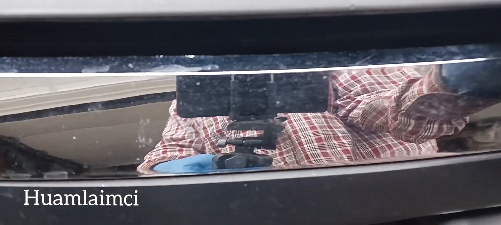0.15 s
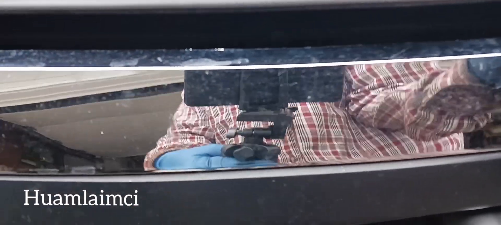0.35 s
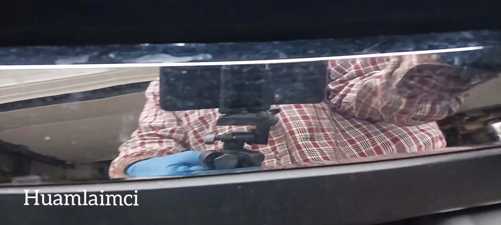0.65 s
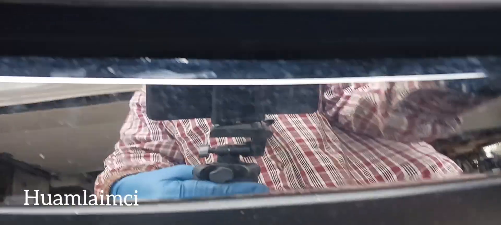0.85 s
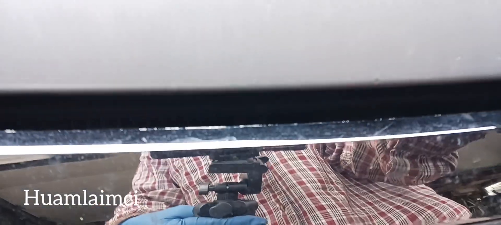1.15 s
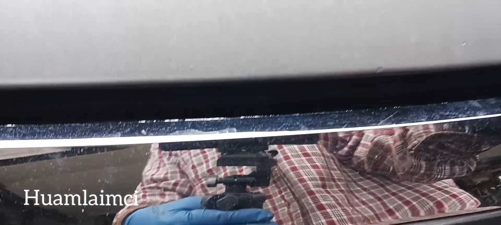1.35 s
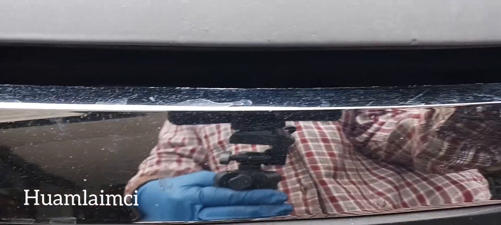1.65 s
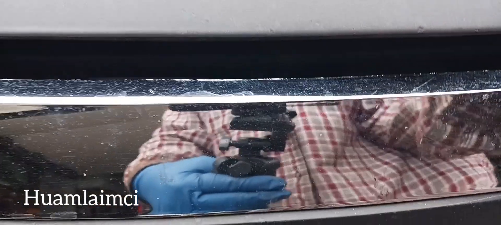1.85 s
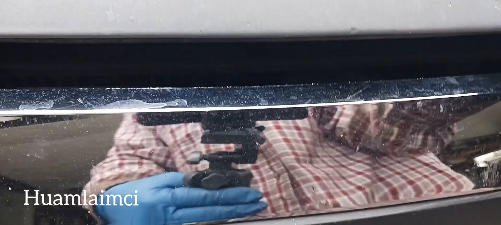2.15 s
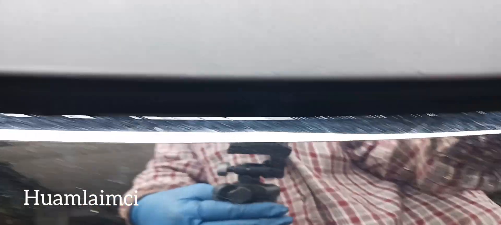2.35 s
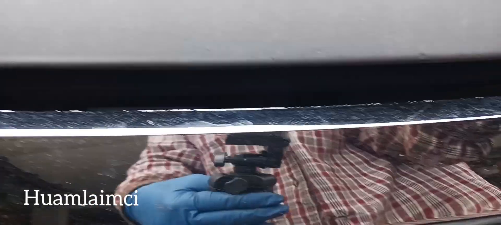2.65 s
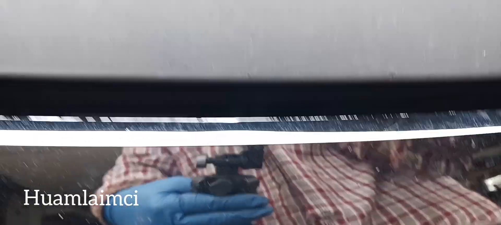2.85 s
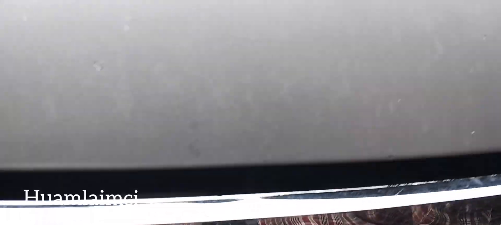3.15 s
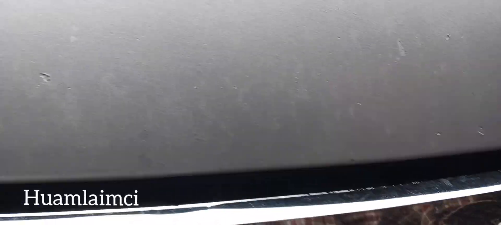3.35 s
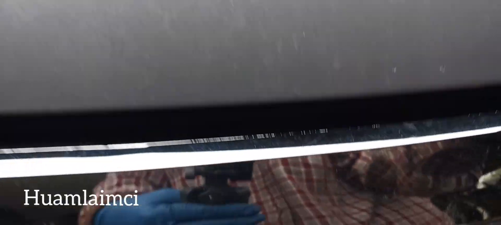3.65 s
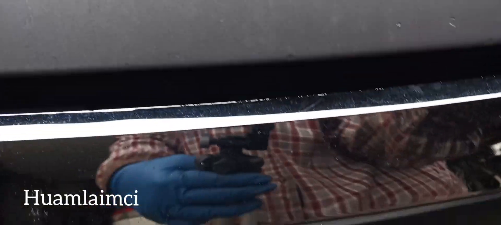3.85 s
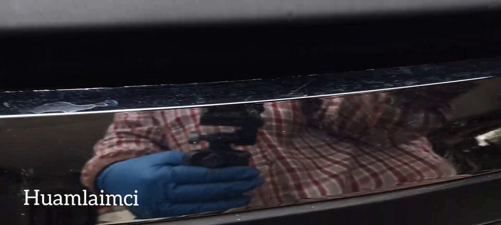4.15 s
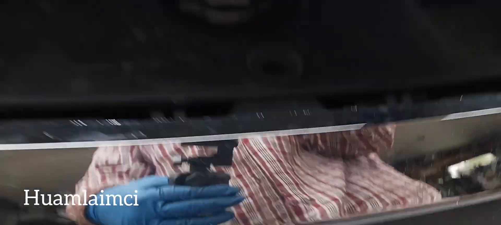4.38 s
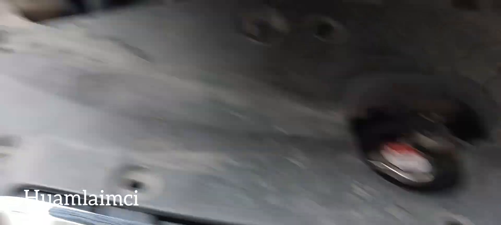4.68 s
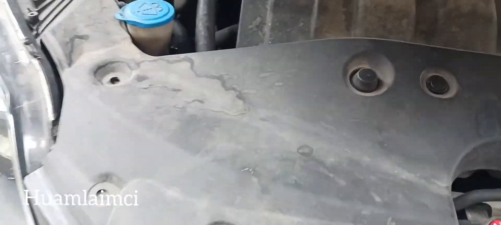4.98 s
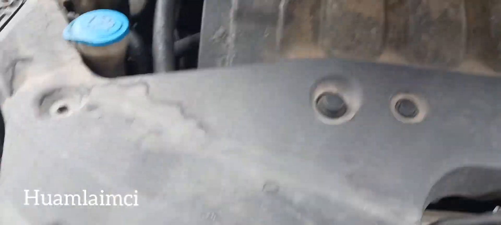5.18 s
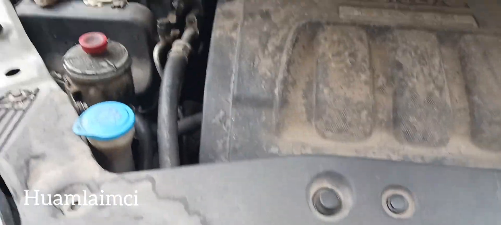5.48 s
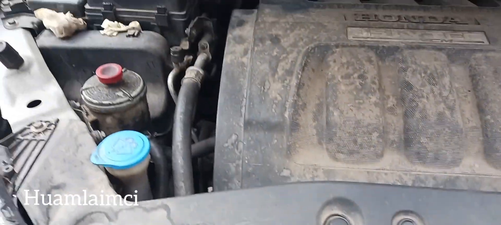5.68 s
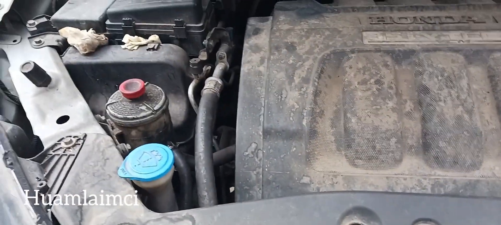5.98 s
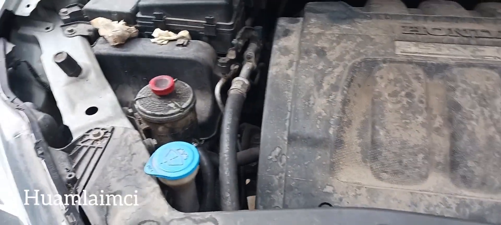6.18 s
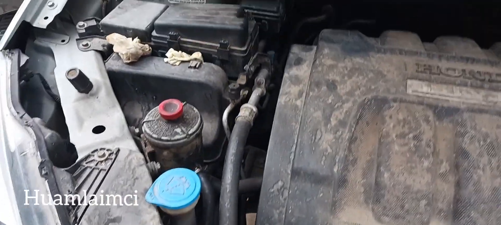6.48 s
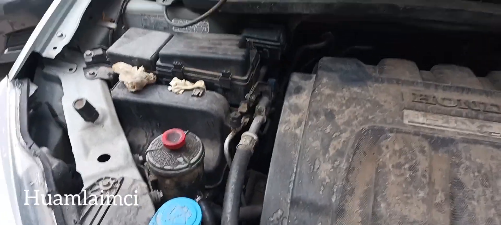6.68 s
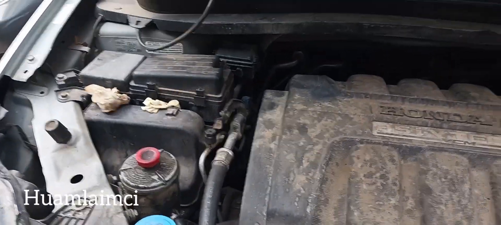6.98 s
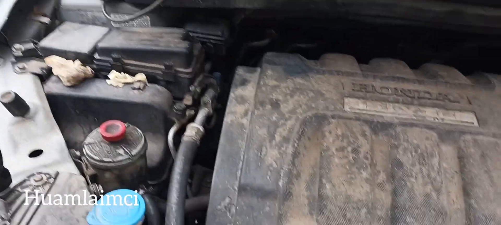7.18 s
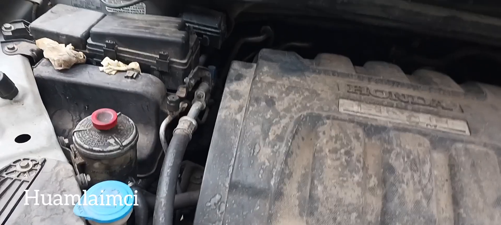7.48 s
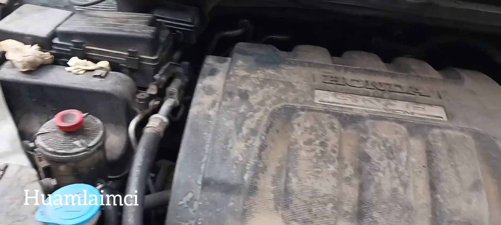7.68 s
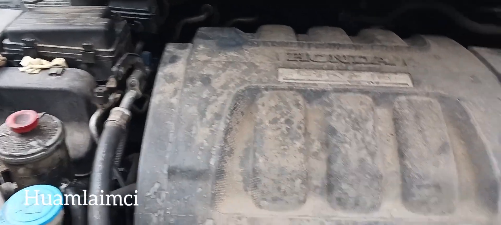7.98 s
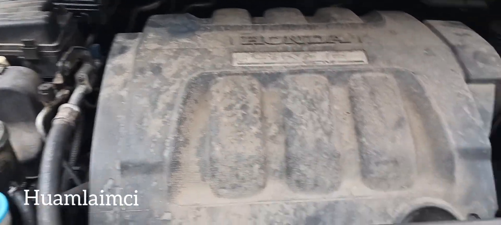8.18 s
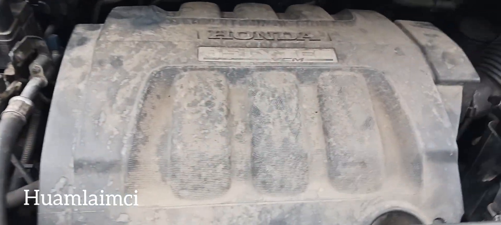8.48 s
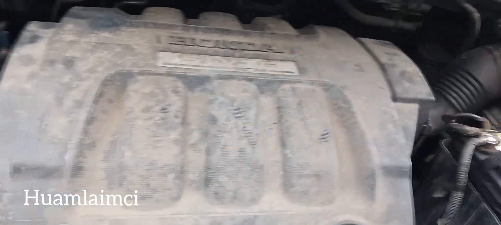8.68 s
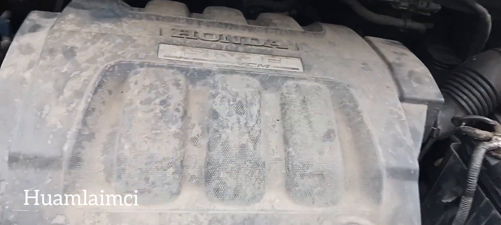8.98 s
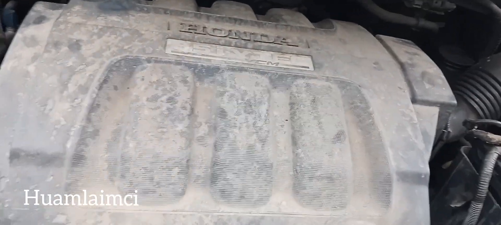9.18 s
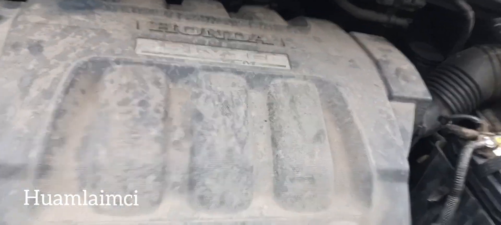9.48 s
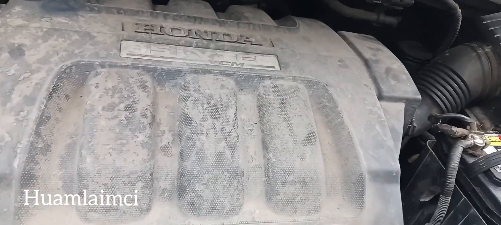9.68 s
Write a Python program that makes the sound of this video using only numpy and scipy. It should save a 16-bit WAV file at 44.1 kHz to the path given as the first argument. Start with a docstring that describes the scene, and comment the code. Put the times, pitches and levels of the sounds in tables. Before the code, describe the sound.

Close outdoors, a car hood thumps on its catch, the steel latch snaps and rings, then the panel springs up with clatter and small ticks.

```python
"""A car hood, close by outdoors, bumps on its catch, is unlatched and lifted: struck panel and latch modes.
The steel latch cracks as shaped noise and its springs ring as long modes; ticks, slips and sleeve rub follow.
A bird chips farther off in raspy swept tones; wavering sines make faint far bird notes and one thin ring,
probably of the catch spring. Shaped noise makes wind on the two camera microphones and far traffic; two low
tones are distant engines, a thin insect hiss comes and goes, and the camera mount whines now and then."""
import sys
import numpy as np
from scipy import signal
from scipy.fft import rfft, irfft, next_fast_len
from scipy.io import wavfile
from scipy.ndimage import uniform_filter1d

SR = 44100
rng = np.random.default_rng(int(sys.argv[2]) if len(sys.argv) > 2 else 0)


def digitize_waveform(pressure):
    """Quantize a signal to 16-bit integers and store it at the path in sys.argv[1].

    Rows of a 2-D input are taken as channels; values are limited to [-1, 1].
    """
    field = np.atleast_2d(pressure).T
    bounded = np.clip(field, -1, 1)
    quanta = np.round(bounded * 32767).astype(np.int16)
    wavfile.write(sys.argv[1], SR, quanta)


N = 433503
TIME = np.arange(N) / SR  # seconds into the scene
AGE = np.arange(32768) / SR  # seconds since a sound began


def amp(db):
    """Decibels to gain."""
    return 10 ** (np.asarray(db) / 20)


def unit(x):
    """Scales to rms 1."""
    return x / np.sqrt(np.mean(x ** 2) + 1e-20)


def fall(t60):
    """Gain of free decay: 60 dB lost in t60 seconds."""
    return np.exp(-np.log(1000) * AGE / t60)


def read(points, hz):
    """Reads a table on a log-frequency axis."""
    f, value = np.transpose(points)
    return np.interp(np.log(hz + 1), np.log(f + 1), value)


def swell(s, db):
    """Gain that follows a level curve and fades to silence outside it."""
    inside = 1. * ((TIME >= s[0]) & (TIME <= s[-1]))
    return amp(np.interp(TIME, s, db)) * uniform_filter1d(inside, size=900)


def wander(per_s):
    """Slow random drift about zero, with a new turn per_s times a second."""
    return np.interp(TIME * per_s, np.arange(512), rng.standard_normal(512))


def jitter(size, smooth):
    """Random unsteadiness of rms 1, averaged over `smooth` samples."""
    return unit(uniform_filter1d(rng.standard_normal(size), size=smooth))


def add(mix, s, sound, pan_db=0):
    """Mixes a sound in at time s, leaning left by pan_db."""
    sound = sound * amp([[pan_db / 2], [-pan_db / 2]])
    sound = sound[:, max(-round(s * SR), 0):]  # a negative time cuts off the start
    part = mix[:, max(round(s * SR), 0):][:, :sound.shape[1]]
    part += sound[:, :part.shape[1]]


# likeness of the two microphones: f/Hz, likeness/0-1
MIC_LIKENESS = [(30, 0.4), (100, 0.78), (250, 0.9), (500, 0.5), (1000, 0), (4000, 0.03), (14000, 0)]


def noise(spectrum, size):
    """Coloured noise at two microphones, alike in the bass and nearly unrelated in the treble."""
    full = next_fast_len(size)
    hz = np.fft.rfftfreq(full, 1 / SR)
    left, other = np.exp(2j * np.pi * rng.random((2, len(hz))))
    alike = np.clip(read(MIC_LIKENESS, hz), -1, 1)
    right = alike * left + np.sqrt(1 - alike ** 2) * other
    shaped = np.array([left, right]) * amp(read(spectrum, hz)) * (hz > 0)
    return unit(irfft(shaped, full)[:, :size])


def wash(spectrum, decay, tilt_db=0, count=9):
    """Noise standing for countless crowded modes struck at once: each band dies at its own speed."""
    hz = np.fft.rfftfreq(len(AGE), 1 / SR)
    tilted = [(f, db + tilt_db * np.log2(f)) for f, db in spectrum]
    z = rfft(noise(tilted, len(AGE)))
    centres = np.geomspace(60, 15000, count)
    out = 0
    for f, band in zip(centres, np.eye(count)):
        share = read(np.c_[centres, band], hz)  # overlapping triangular bands
        out = out + irfft(z * share) * fall(read(decay, f))
    return out


def onset(rise):
    """Vibration takes a moment to spread through the metal."""
    return 1 - np.exp(-AGE / rise)


def ring(modes, detune=.006, apart=1):
    """Clear decaying modes; higher ones reach the two microphones out of step."""
    out = np.zeros((2, len(AGE)))
    for hz, db, t60 in modes:
        drift, skew, start = rng.standard_normal(3)
        phase = start + np.array([[1], [-1]]) * apart * skew * (1 - read(MIC_LIKENESS, hz))
        tone = np.sin(2 * np.pi * hz * (1 + detune * drift) * AGE + phase)
        out += amp(db) * fall(t60) * tone
    return out * onset(0.00082)


def jangle(low_hz, high_hz, t60, count=64):
    """Brackets and sheet metal ring with scattered modes; the higher ones tend to die sooner."""
    place, size, life = rng.random((3, count))
    hz = low_hz * (high_hz / low_hz) ** place
    lives = t60 * (.5 + life) * np.sqrt(low_hz / hz)
    return ring(np.c_[hz, -12 * size, lives]) / np.sqrt(count / 6)


def push(width):
    """One swing of air, down and up, from a panel shoved once."""
    u = AGE / width - 3
    return u * np.exp((1 - u ** 2) / 2)


# wind rumble on the microphones: f/Hz, relative level/dB per Hz
WIND_SPECTRUM = [(10, -56), (22, -25), (32, -17.5), (45, 3), (70, 1.5), (90, -4), (110, -6), (230, -22.5),
                 (280, -19), (450, -37), (800, -74)]
# far traffic across the yard: f/Hz, relative level/dB per Hz
TRAFFIC_SPECTRUM = [(150, -1), (350, 2), (550, -7), (900, 1.5), (1400, -2.5), (2000, -9), (2800, -20.5),
                    (4200, -20.5), (6000, -24.5), (9000, -24.5), (13000, -22.5), (16000, -27.5)]
# wind rumble over time: t/s, level/dB
WIND_COURSE = [(0, -44.5), (0.9, -44.5), (1.6, -45.5), (2.7, -45), (3.8, -51), (6.5, -48.5), (7.5, -49.5),
               (8.7, -45), (9.83, -49)]
# distant engine easing off and pulling again: t/s, f/Hz, level/dB before drone_db
ENGINE_COURSE = [(0.15, 85.2, -68), (0.35, 84.8, -42.5), (0.8, 83, -44), (1.499, 81.3, -40.5),
                 (1.85, 72.9, -50.5), (2.02, 70.7, -34.5), (2.45, 72.4, -38), (2.95, 75.7, -53)]


def outdoors(gust_db=3, gusts_per_s=14, traffic_db=-63.0, swell_db=-0.46,
             drone_db=-1.5, idle_db=-56, idle_hz=81):
    """Lumpy wind on the microphones, a wash of far traffic, one droning engine and a fainter one idling."""
    out = np.zeros((2, N))
    wind = unit(noise(WIND_SPECTRUM, N) * amp(gust_db * wander(gusts_per_s)))
    add(out, 0, amp(np.interp(TIME, *np.transpose(WIND_COURSE))) * wind, -3.5)
    add(out, 0, amp(traffic_db + swell_db * wander(2.8)) * noise(TRAFFIC_SPECTRUM, N), 1.5)
    s, hz, db = np.transpose(ENGINE_COURSE)
    engine = np.sqrt(2) * np.sin(2 * np.pi * np.cumsum(np.interp(TIME, s, hz)) / SR)
    add(out, 0, amp(drone_db) * swell(s, db) * engine, -1)
    idle_level = amp(idle_db + 3 * wander(3))
    idle = np.sin(2 * np.pi * np.cumsum(idle_hz + 1.5 * wander(1.3)) / SR)
    add(out, 0, idle_level * idle, -3)
    return out


# bird chips: t/s, level/dB, starting f/Hz, level/dB of the hollow note under it
BIRD_CHIPS = [(-0.022, -33.5, 4400, -31.5), (1.329, -36.5, 5050, -42), (3.587, -35, 4520, -32)]
# hollow note under a chip: f/Hz, relative level/dB per Hz
HOLLOW_SPECTRUM = [(250, -33), (440, -13), (520, -7.5), (560, -9.5), (640, -22.5), (1000, -26), (3000, -67)]
# echo of a chip: f/Hz, relative level/dB per Hz
CHIP_ECHO_SPECTRUM = [(2000, -64), (3100, -17), (3500, -7), (3720, 2), (3920, -5.5), (4150, -15),
                      (4380, -9.5), (4650, -26), (5000, -34.5), (8000, -68)]


def birds(end_hz=3640, length=0.025, echo_db=-16, echo_t60=0.68,
          linger_db=-13, linger_hz=3820, linger_t60=.8, sag_hz_per_s=650,
          second_voice=.86, second_db=-12, wall_db=-7, wall_t60=0.23):
    """Quick, raspy downward sweeps in two voices; near walls smear them and a sagging tone lingers in trees."""
    out = np.zeros((2, N))
    t = AGE[AGE < length]
    rasp = .08  # rms pitch shake, as a share of the pitch
    for s, db, start_hz, hollow in BIRD_CHIPS:
        hz = end_hz + (start_hz - end_hz) * np.exp(-t / 0.01)
        shaken_hz = hz * (1 + rasp * jitter(len(t), 12))
        phase = 2 * np.pi * np.cumsum(shaken_hz) / SR + rng.uniform(-1, 1, (2, 1))
        voice = sum(amp(level) * np.sin((k + 1) * phase) for k, level in enumerate([-1.5, -9, -14, -18]))
        voice = voice + amp(second_db) * np.sin(second_voice * phase)
        chip = amp(db) * unit(voice * signal.windows.tukey(len(t), .7))
        add(out, s, chip, 2)

        walls = wash([(2000, 0), (16000, 0)], [(3000, wall_t60), (5000, wall_t60)]) * onset(.002)
        smear = signal.fftconvolve(chip, walls / np.linalg.norm(walls[0]), axes=1)
        add(out, s, amp(wall_db) * smear, 1)
        echo = wash(CHIP_ECHO_SPECTRUM, [(3000, echo_t60), (5000, echo_t60)])
        add(out, s, amp(db + echo_db) * echo * onset(0.0045))

        sagging = np.sin(2 * np.pi * (linger_hz - sag_hz_per_s * AGE / 2) * AGE)
        linger = sagging * noise([(10, 1.5), (55, -7), (260, -33.5), (2000, -90.5)], len(AGE))
        add(out, s, amp(db + linger_db) * linger * fall(linger_t60) * onset(.01))
        add(out, s, amp(hollow) * wash(HOLLOW_SPECTRUM, [(100, 0.32), (1000, 0.17)]) * onset(.006))
    return out


STROKE_FADE_DB = -26  # lost over the fade time


def stroke(s, rise, fade):
    """Gain of one rub: a smooth swell, then a steady fall in decibels."""
    age = TIME - s
    rising = np.sin(np.pi / 2 * np.clip(age / rise, 0, 1)) ** 2
    return rising * amp(STROKE_FADE_DB * np.maximum(age - rise, 0) / fade)


# sleeve rubs: t/s, swell time/s, fade time/s, level/dB before cloth_db
SLEEVE_RUBS = [(0.0, .01, 1, -60.5), (0.95, 0.49, 0.27, -60), (2.95, 0.12, 0.34, -54.5),
               (4.6, 0.066, 0.29, -53.5), (5.06, 0.064, 0.14, -63.5), (6.75, 0.034, 0.14, -49),
               (8.549, 0.037, 0.39, -50), (8.99, 0.045, 0.48, -67.5), (9.135, 0.029, 0.15, -48)]
# rubbed cloth: f/Hz, relative level/dB per Hz
CLOTH_SPECTRUM = [(300, 0), (1500, 1), (3800, -0.5), (7000, -6), (13000, -7.5), (16000, -12.5)]
# soft low bumps of hood and hand: t/s, peak level/dB before panning, f/Hz, swell time/s
SOFT_BUMPS = [(0.992, -29, 118, 0.0088), (4.093, -25.5, 68.3, 0.022), (4.282, -28.5, 62.8, 0.015),
              (5.008, -36.5, 126, 0.0025), (5.134, -32.5, 72, 0.0066), (6.453, -29, 72.8, 0.0061),
              (7.019, -35, 68.5, 0.011), (8.48, -27, 145, 0.0027), (8.811, -41, 49, 0.019),
              (8.907, -31, 70.6, 0.0083)]


def handling(cloth_db=-1, grain_db=1.5):
    """A sleeve rubs in tiny catches; hood and hand give soft low bumps."""
    out = np.zeros((2, N))
    grain = amp(grain_db * jitter(N, 90))
    rubbing = sum(amp(db) * stroke(s, rise, fade) for s, rise, fade, db in SLEEVE_RUBS)
    add(out, 0, amp(cloth_db) * unit(noise(CLOTH_SPECTRUM, N) * grain) * rubbing, 2)
    for s, peak, hz, rise in SOFT_BUMPS:
        envelope = AGE / rise * np.exp(1 - AGE / rise)  # reaches 1 at the swell time
        add(out, s, amp(peak) * np.sin(2 * np.pi * hz * AGE) * envelope, -4)
    return out


# ticks of hinge, prop and fingers: t/s, knock level/dB and click level/dB before trims, left-right/dB
SMALL_TICKS = [(0.257, -71, -62.5, 15), (1.131, -57, -59, 3), (4.053, -55.5, -52.5, 5.5),
               (4.459, -60.5, -52, 2), (4.482, -44.5, -43.5, 3), (4.496, -43, -44, -2),
               (4.555, -41, -47.5, -5), (4.606, -42.5, -61, -4), (4.818, -35.5, -46.5, -7),
               (5.055, -58, -74, -1.5), (5.37, -79.5, -57.5, 5), (7.508, -46.5, -75, -1.5),
               (7.537, -44.5, -44.5, -1), (8.649, -39.5, -70, 2.5), (8.678, -48, -58, -9),
               (8.788, -58, -45, -1), (9.274, -51.5, -78, 1), (9.458, -50.5, -64.5, -0.5)]
# hollow knock: f/Hz, relative level/dB per Hz
KNOCK_SPECTRUM = [(100, 6.5), (400, -5), (800, -5.5), (1400, -4.5), (2000, -10), (3000, -11.5), (6000, -26)]
# hard bright crack of steel, also the click of a tick: f/Hz, relative level/dB per Hz
CRACK_SPECTRUM = [(500, -17), (1500, -5.5), (3200, -3.5), (5000, 3), (6200, -3.5), (7500, -1.5), (9000, -1),
                  (13500, -3.5), (16000, -13)]
# decay of small parts: f/Hz, t60/s
SMALL_PART_DECAY = [(200, 0.088), (1300, 0.2), (4000, 0.088), (14000, .04)]


def ticks(knock_db=2, click_db=0, contact_db=7, contact_s=.003):
    """Small hard parts touch: a bright click over a short, hollow knock."""
    out = np.zeros((2, N))
    contact = (1 + amp(contact_db) * np.exp(-AGE / contact_s)) * onset(0.0017)
    for s, knock, click, pan in SMALL_TICKS:
        hollow = amp(knock + knock_db) * wash(KNOCK_SPECTRUM, SMALL_PART_DECAY)
        bright = amp(click + click_db) * wash(CRACK_SPECTRUM, SMALL_PART_DECAY)
        add(out, s, (hollow + bright) * contact, pan)
    return out


# hood bumps on the catch: t/s, body level/dB and edge level/dB before trims,
# left-right/dB of the body before trim
HOOD_THUDS = [(0.54, -19.5, -27, -3), (0.777, -29.5, -45.5, -3.5), (0.943, -21.5, -27, -2),
              (1.926, -20.5, -35, -3), (2.248, -33, -62, -2.5), (2.554, -18.5, -31, -2),
              (2.834, -30.5, -57, -2), (2.862, -30, -46.5, -3), (4.091, -22.5, -35, -3.5),
              (4.28, -22.5, -25.5, -5.5)]
# body of the panel: f/Hz, relative level/dB per Hz
PANEL_BODY_SPECTRUM = [(10, -55.5), (25, -21), (50, -5), (130, -10.5), (240, -1), (360, -0.5), (520, -4.5),
                       (750, -9.5), (1200, -16.5), (2000, -45), (5000, -78.5)]
# harder edge of the thud: f/Hz, relative level/dB per Hz
PANEL_EDGE_SPECTRUM = [(300, -21.5), (700, -2.5), (1150, 5.5), (1800, -10), (2700, -11), (4000, -22.5),
                       (7000, -29), (15000, -39.5)]
# clear panel modes before detuning: f/Hz, relative level/dB, t60/s
PANEL_MODES = [(66.6, -15.5, 0.22), (133, -6, 0.47), (185.4, -4.5, 0.39), (225.1, -4.5, 0.6),
               (278, -1, 0.15), (337, -1, 0.24), (369.4, -6, 0.53), (447, -10, .35), (523, -12.5, .25),
               (633, -12, 0.057), (890, -22.5, 0.14), (1106, -12, 0.29), (1350, -27.5, 0.31)]
# decay of the sheet metal: f/Hz, t60/s
SHEET_DECAY = [(60, 0.13), (250, 0.38), (600, 0.21), (1500, 0.23), (4000, 0.24), (14000, 0.22)]


def hood(body_db=-3, edge_db=0, modes_db=-5, jangle_db=-6, push_db=8,
         rebound_s=.0195, rebound_db=-2, firm_db=-23, dulling=0.23):
    """The panel hits the catch, rings, and rebounds once on its rubber stops; soft bumps are duller."""
    out = np.zeros((2, N))
    brackets = jangle(900, 3600, 0.15)
    shove = amp(push_db) * push(.0008)
    for s, level, edge, pan in HOOD_THUDS:
        tilt = dulling * min(level - firm_db, 0)  # dB an octave
        body = amp(body_db) * wash(PANEL_BODY_SPECTRUM, SHEET_DECAY, tilt) * onset(0.0043)
        body = body + amp(modes_db) * ring(PANEL_MODES)
        add(out, s, amp(level) * (body + shove), pan - 1)
        add(out, s + rebound_s, -amp(level + rebound_db) * shove, pan - 2)
        rim = amp(edge_db) * wash(PANEL_EDGE_SPECTRUM, SHEET_DECAY) + amp(jangle_db) * brackets
        add(out, s, amp(edge) * rim * onset(0.0026), 1)
    return out


def shudder(rumble_db=-21, rumble_t60=0.64, rattle_db=-33, rattle_t60=1.0):
    """Every blow shakes the car body: a low rumble and a faint rattle die away after it."""
    out = np.zeros((2, N))
    blows = [(s, body) for s, body, _, _ in HOOD_THUDS]
    blows += [(s, clang) for s, _, _, _, clang, _, _ in LATCH_SNAPS]
    for s, db in blows:
        rumble = amp(rumble_db - 60 * AGE / rumble_t60) * noise(WIND_SPECTRUM, len(AGE))
        rattle = amp(rattle_db - 60 * AGE / rattle_t60) * noise(TRAFFIC_SPECTRUM, len(AGE))
        add(out, s, amp(db) * (rumble + rattle) * onset(.01), -2)
    return out


# latch snaps and rattles, levels before trims: t/s, crack level/dB, first-contact spike/dB,
# brightness/dB an octave, clang level/dB, hood weight in the clang/dB, left-right/dB of the crack
LATCH_SNAPS = [(0.797, -32, 14, -4, -15.5, -11.5, 2.5), (0.808, -33, 21.5, -11, -13.5, -2, 4.5),
               (0.946, -62, 7, 5, -45, 8, -4.5), (0.999, -52, 9, -22, -31.5, 0.5, 3),
               (3.176, -27.5, 6, -4, -12.5, -2, -0.5), (4.267, -40, 9, 1, -45.5, -5, 1.5),
               (4.277, -41.5, 6.5, -2.5, -38, -8.5, -0.5), (4.304, -23.5, 15.5, 3.5, -18.5, -28, -3),
               (4.311, -29.5, 7.5, -2, -18, -13.5, -5), (4.328, -26, -7, -2, -20.5, -15, -4)]
# clang of the latch plate: f/Hz, relative level/dB per Hz
CLANG_SPECTRUM = [(20, -57), (110, -22), (250, -7.5), (340, -9.5), (450, -4), (540, 0.5), (650, -3.5),
                  (850, -4.5), (1100, -10.5), (1600, -20.5), (2400, -14.5), (3500, -29), (7000, -37.5)]
# decay of the latch steel: f/Hz, t60/s
STEEL_DECAY = [(100, 1), (400, 0.32), (900, 0.15), (2400, 0.2), (6000, 0.2), (14000, .13)]
# clear modes before detuning, of plate, hood weight and two springs: f/Hz, relative level/dB, t60/s
PLATE_MODES = [(354, -11, 0.12), (372, -6, 0.23), (454, -4, 0.25), (528.2, -3.5, 0.25), (619, -11, 0.22),
               (760, -10, 0.4), (860, -9.5, 0.15), (1100, -11, 0.25), (2340, -11, 0.19),
               (2696, -20.5, 0.17)]
HOOD_WEIGHT_MODES = [(128, -8, 0.17), (173, -7.5, 0.11), (211.5, 0, 0.3), (250, -11, 0.12),
                     (299, -13.5, 0.15)]
CATCH_SPRING_MODES = [(436, -5, 1.2), (670, 2, 0.87), (879.5, 10.5, 0.13), (1270, -15.5, 0.76),
                      (1876, -22.5, .4), (2358, -25, 1.1), (2326, -24.5, .85), (2416, -23, 1.3),
                      (2998, -21, .5)]
LEVER_SPRING_MODES = [(445, -9.5, 1.1), (1382, -9.5, 0.72), (1710, -11, 0.7), (1980, -5, .25),
                      (2267, -7.5, 1.0), (2340, -3, 1.1), (2640, -7, .55), (2650, -2.5, 0.49),
                      (2960, -1.5, .4), (4053, -17.5, .65)]
# plucks of the springs: t/s, catch spring level/dB, lever spring level/dB, both scaling the modes
SPRING_PLUCKS = [(0.808, -51, -48), (3.177, -33.5, -61), (4.311, -72.5, -39.5)]


def latch(crack_db=-2, contact_s=0.0067, clang_db=-3, modes_db=-4, weight_db=0,
          jangle_db=-20, sparkle_db=-7, jolt_db=5):
    """Steel hits steel: a hard crack, the clang of the latch plate, and its springs singing on."""
    out = np.zeros((2, N))
    brackets, pawl = jangle(1000, 4500, 0.56), jangle(4500, 14500, 0.22)
    for s, crack, spike, bright, clang, weight, pan in LATCH_SNAPS:
        contact = 1 + amp(spike) * np.exp(-AGE / contact_s)
        steel = amp(crack_db) * wash(CRACK_SPECTRUM, STEEL_DECAY, bright) * contact
        steel = steel + amp(sparkle_db) * pawl
        add(out, s, amp(crack) * steel * onset(0.00032), pan)

        plate = amp(clang_db) * wash(CLANG_SPECTRUM, STEEL_DECAY)
        plate = plate + amp(modes_db) * ring(PLATE_MODES) + amp(jangle_db) * brackets
        add(out, s, amp(clang) * plate * onset(.002), -1.5)
        add(out, s, amp(clang + weight + weight_db) * ring(HOOD_WEIGHT_MODES) * onset(0.0082), -4)
        add(out, s, amp(clang + weight + jolt_db) * push(0.00036), -1)
    for s, catch, lever in SPRING_PLUCKS:
        add(out, s, amp(catch) * ring(CATCH_SPRING_MODES, detune=.001, apart=0.51))
        add(out, s, amp(lever) * ring(LEVER_SPRING_MODES, detune=0.0011, apart=0.64))
    return out


# far bird notes, and at 3.1 s a thin ring, probably of the catch spring:
# t/s, length/s, start f/Hz, end f/Hz, level/dB before notes_db and far_direct_db
FAINT_NOTES = [(0.97, 0.13, 4100, 4030, -63), (1.228, 0.14, 3850, 3790, -64.5),
               (3.1, 0.38, 3670, 3740, -67), (5.076, .12, 4320, 3960, -77),
               (5.079, 0.14, 3305, 3090, -71.5), (6.141, 0.096, 2990, 3010, -79),
               (6.858, 0.28, 4160, 3934, -71), (6.888, 0.085, 3230, 3085, -63.5),
               (7.005, 0.78, 3830, 3716, -76), (7.441, 0.42, 3790, 3584, -76),
               (7.707, 0.21, 4180, 4390, -78), (9.598, 0.14, 4300, 4360, -77.5)]


def faint_notes(notes_db=-5):
    """Thin tones, far bird notes and one probable spring ring, swell and fade, wavering a little."""
    waver = .014  # rms, as a share of the pitch
    out = np.zeros((2, N))
    for s, length, start_hz, end_hz, db in FAINT_NOTES:
        size = round(length * SR)
        hz = np.linspace(start_hz, end_hz, size) * (1 + waver * jitter(size, 160))
        tone = np.sin(2 * np.pi * np.cumsum(hz) / SR) * np.sqrt(np.hanning(size))
        add(out, s, amp(db + notes_db) * unit(tone), 1)
    return out


def glide(length, start_hz, end_hz, width_hz):
    """A sliding tone, blurred to a narrow band, that swells and fades."""
    size = max(round(length * SR), 64)
    turns = np.cumsum(np.linspace(start_hz, end_hz, size)) / SR
    band = [(width_hz / 2, 0), (width_hz, -6), (4 * width_hz, -30), (20 * width_hz, -70)]
    blur = noise(band, len(AGE))[:, :size]
    size = blur.shape[1]
    return unit(blur * np.cos(2 * np.pi * turns[:size]) * signal.windows.tukey(size, .7))


# dry slips of lever and hinge: t/s, length/s, start f/Hz, end f/Hz, level/dB
METAL_SLIPS = [(4.274, 0.011, 2810, 4900, -32), (4.285, 0.011, 1760, 1340, -44),
               (4.479, 0.019, 1465, 1670, -44), (4.552, 0.0052, 1430, 1660, -41.5),
               (4.602, 0.015, 1440, 1310, -49), (5.059, 0.14, 950, 1090, -61),
               (8.65, 0.0068, 1360, 1350, -36.5), (8.667, 0.026, 1325, 1360, -49),
               (8.714, 0.073, 1290, 1110, -56.5)]


def slips(width_hz=260):
    """Dry metal drags for an instant and croaks."""
    out = np.zeros((2, N))
    for s, length, start_hz, end_hz, db in METAL_SLIPS:
        add(out, s, amp(db) * glide(length, start_hz, end_hz, width_hz), 1)
    return out


LIFT_S = 4.3  # the freed hood springs up


def lift(gust_db=-31, gust_t60=0.16, clatter_db=-42, clatter_t60=0.79, knocks_per_s=170, uneven_db=5):
    """The rising hood shoves the air, and its loose catch and hinges clatter ever more softly."""
    out = np.zeros((2, N))
    gust = amp(gust_db - 60 * AGE / gust_t60) * noise(WIND_SPECTRUM, len(AGE)) * onset(0.0055)
    add(out, LIFT_S, gust, -3.5)
    for _ in range(4):  # four streams of knocks, each with its own knock sound
        struck = rng.random(len(AGE)) < knocks_per_s / 4 / SR
        knocks = struck * amp(uneven_db * rng.uniform(-1, 1, len(AGE)))
        fading = unit(knocks) * amp(clatter_db - 60 * AGE / clatter_t60)
        knock = wash(KNOCK_SPECTRUM, SMALL_PART_DECAY)
        clatter = signal.fftconvolve(fading[None], knock, axes=1)
        add(out, LIFT_S, .5 * clatter / np.linalg.norm(knock[0]), -1)
    return out


# thin, far insect buzz: t/s, level/dB before the tone's own 3 dB loss
INSECT_COURSE = [(4.6, -85), (5.2, -80.5), (6.55, -78), (6.75, -90)]


def insect(buzz_hz=5850):
    """A far insect makes a narrow hiss: one tone blurred by slow noise."""
    tone = np.sin(2 * np.pi * buzz_hz * TIME)
    blur = noise([(200, 2), (450, -9.5), (1500, -38), (5000, -70)], N)
    return swell(*np.transpose(INSECT_COURSE)) * tone * blur


# swivels of the camera mount: t/s, length/s, level/dB mid-move before grain, f/Hz of the main overtone
# mid-move before flutter
MOUNT_SWIVELS = [(5.603, 0.62, -65, 12600), (6.032, 0.31, -66, 12000), (8.002, 0.41, -65.5, 12500)]
# hiss of the mount: f/Hz, relative level/dB per Hz
MOUNT_HISS_SPECTRUM = [(7000, -1), (10000, -24), (12500, 0), (14000, 9), (16000, 4)]


def mount(whine_db=0, hiss_db=-4.0, sag=0.14, slow_db=-20, grain_db=2):
    """The camera mount whines thinly; its fluttering overtones rise and fall with the speed of each move."""
    out = np.zeros((2, N))
    hiss = noise(MOUNT_HISS_SPECTRUM, N)
    blur = noise([(300, -2.5), (750, 11), (2000, -30), (6000, -77)], N)
    for s, length, db, hz in MOUNT_SWIVELS:
        size = round(length * SR)
        slow = np.linspace(-1, 1, size) ** 2  # 1 at both ends, 0 mid-move
        speed = 1 - sag * slow + .035 * jitter(N, 1500)[:size]
        phase = 2 * np.pi * np.cumsum(hz * speed) / SR
        whine = 0
        for k in range(9, 14):  # overtones 9 to 13; the 11th is the main one
            flutter = np.roll(blur, 3000 * k, axis=1)[:, :size]
            whine = whine + flutter * np.cos(k / 11 * phase) * amp(-4 * abs(k - 11))
        grain = grain_db * jitter(N, 300)[:size]
        sound = unit(whine + amp(hiss_db) * hiss[:, :size])
        add(out, s, amp(whine_db + db + slow_db * slow + grain) * sound, 1)
    return out


# decay of the yard's echo: f/Hz, t60/s
YARD_ECHO_DECAY = [(100, 1), (500, 0.51), (2000, 0.18), (4000, 0.57), (8000, 0.79), (14000, 0.23)]


def yard(x):
    """Walls and trees scatter a diffuse tail back."""
    tail = wash([(100, 1.5), (4000, 4.5), (15000, -11.5)], YARD_ECHO_DECAY) * onset(0.0031)
    return signal.fftconvolve(x, tail / np.linalg.norm(tail[0]), axes=1)[:, :N]


def scene(car_echo_db=-20, bird_echo_db=-17, far_direct_db=-10):
    """The car is close and dry; the chips echo more, and the faint notes are mostly echo."""
    far_air = outdoors()
    chips, notes = birds(), faint_notes()
    car = ticks() + hood() + shudder() + latch() + slips() + lift()
    echo = yard(amp(car_echo_db) * car + amp(bird_echo_db) * chips + notes)
    near = car + handling() + mount()
    return near + chips + amp(far_direct_db) * notes + echo + insect() + far_air


# the left microphone is mostly the brighter one: f/Hz, left-right/dB
MIC_BALANCE = [(60, 2), (250, 0.5), (500, 0), (2000, 4.5), (4000, 3), (9000, 2.5), (14000, 9.5)]
CUTOFF_HZ = 16100


def record(dry, low_cut_hz=30):
    """Each microphone has its own colour and sheds deep bass; loud peaks round off; then the band limit."""
    size = next_fast_len(N + len(AGE))
    lean = read(MIC_BALANCE, np.fft.rfftfreq(size, 1 / SR)) / 2
    heard = irfft(rfft(dry, size) * amp([lean, -lean]), size)[:, :N]
    low_cut = signal.butter(2, low_cut_hz, "high", fs=SR, output="sos")
    heard = signal.sosfilt(low_cut, heard)
    rounded = heard / (1 + (heard / .9) ** 4) ** (1 / 4)
    band_limit = signal.firwin(255, CUTOFF_HZ, window=("kaiser", 9), fs=SR)
    return signal.oaconvolve(rounded, band_limit[None], "same")


dry = scene()
out = record(dry)
digitize_waveform(out)
```